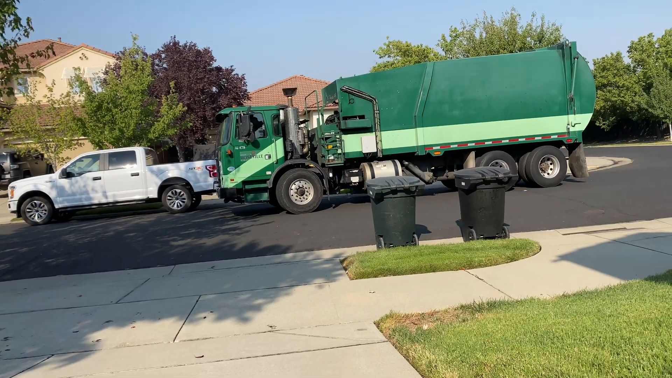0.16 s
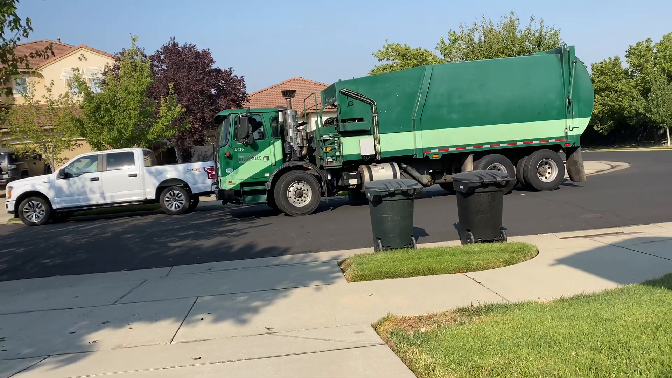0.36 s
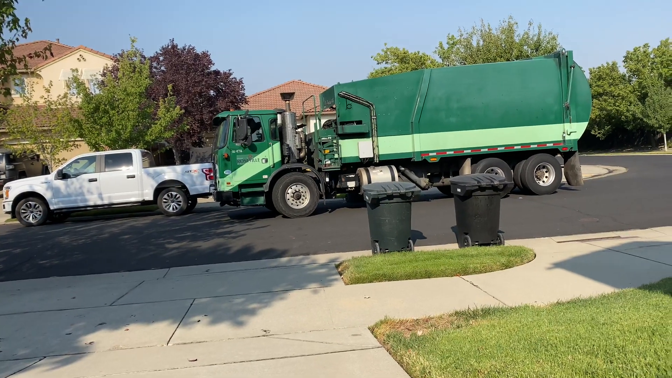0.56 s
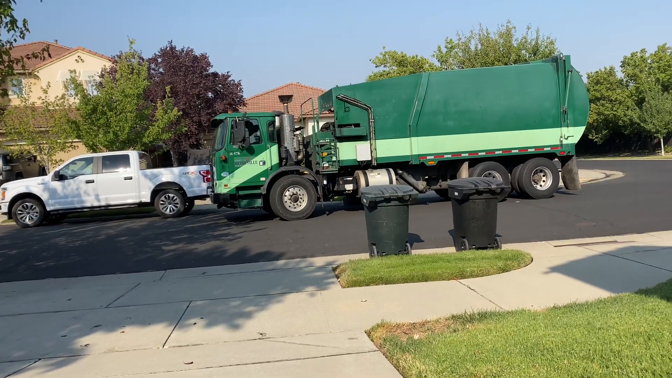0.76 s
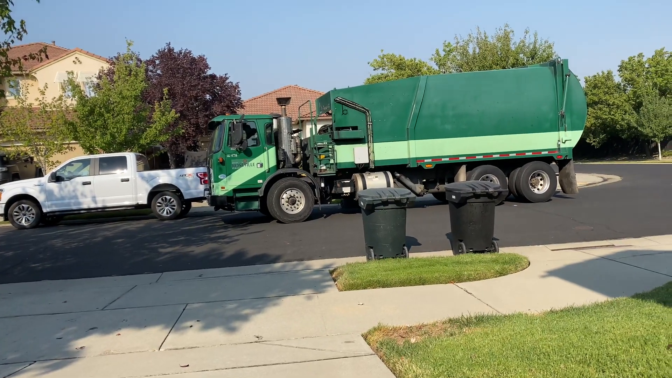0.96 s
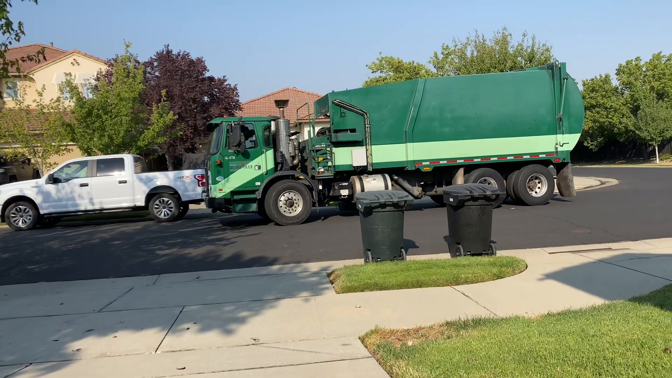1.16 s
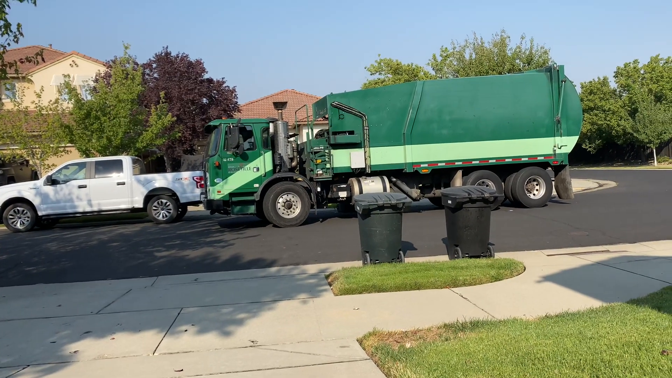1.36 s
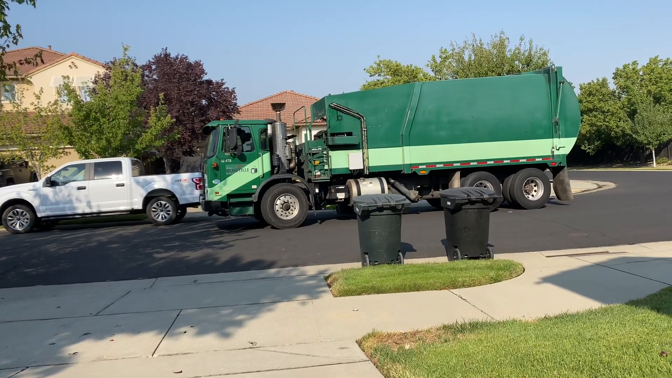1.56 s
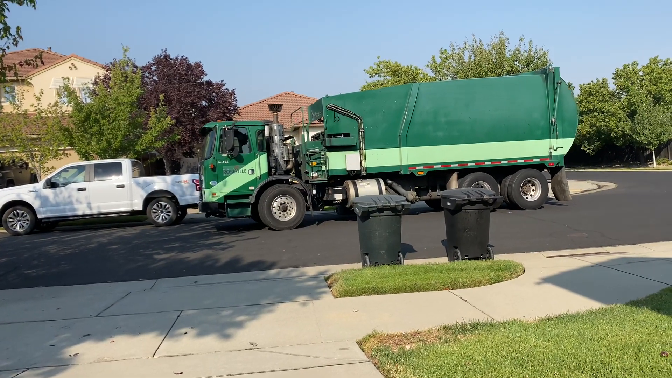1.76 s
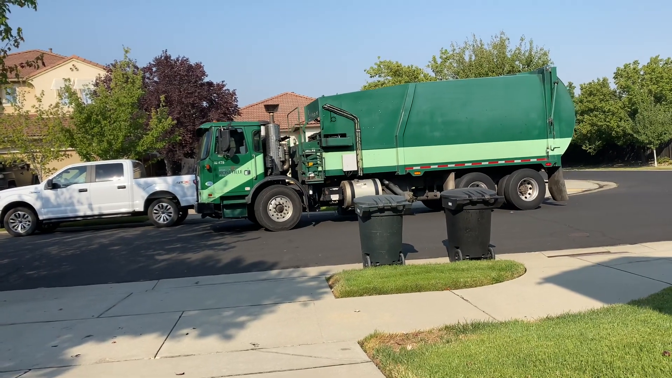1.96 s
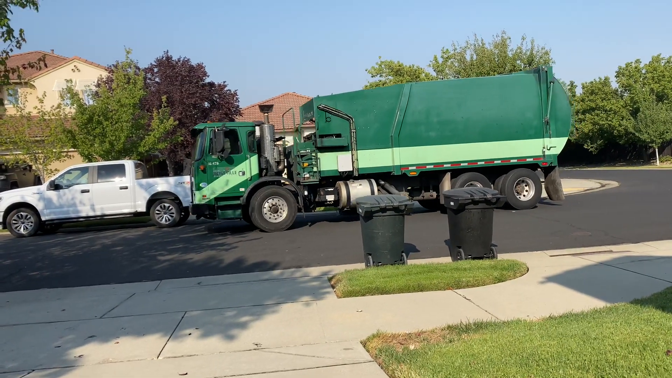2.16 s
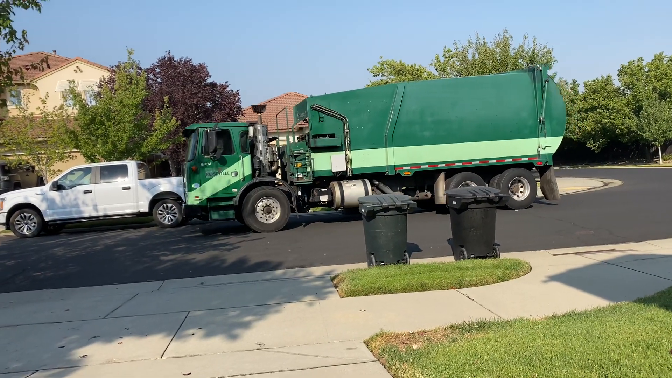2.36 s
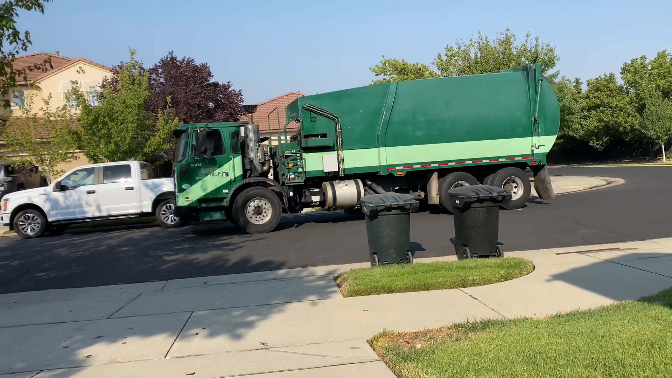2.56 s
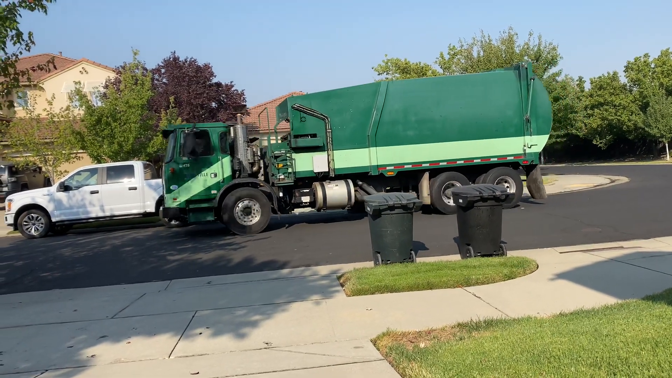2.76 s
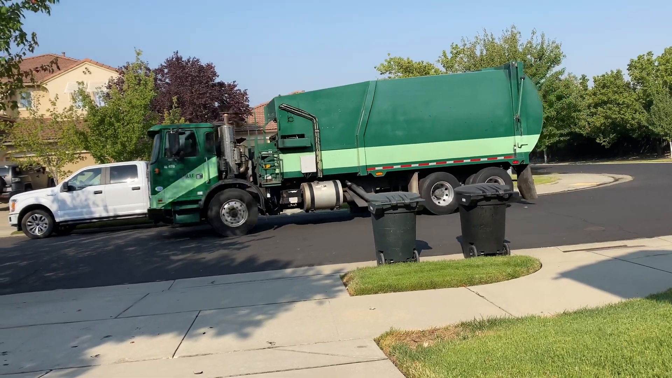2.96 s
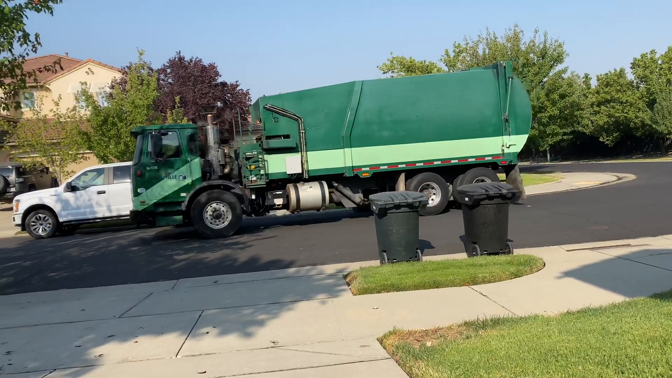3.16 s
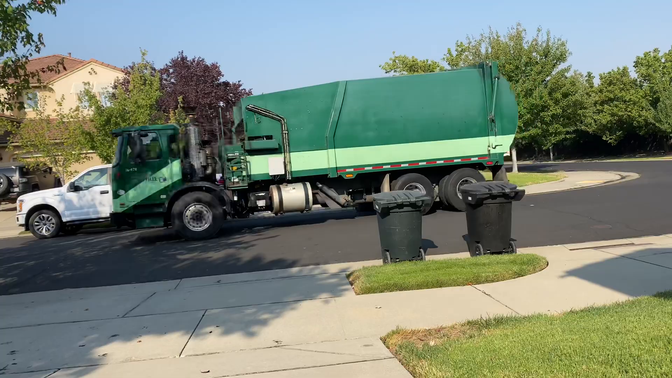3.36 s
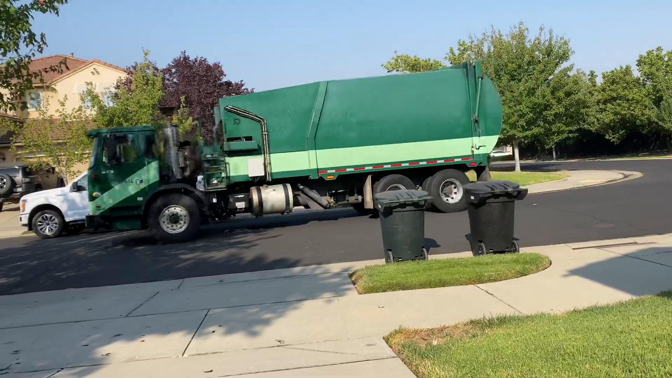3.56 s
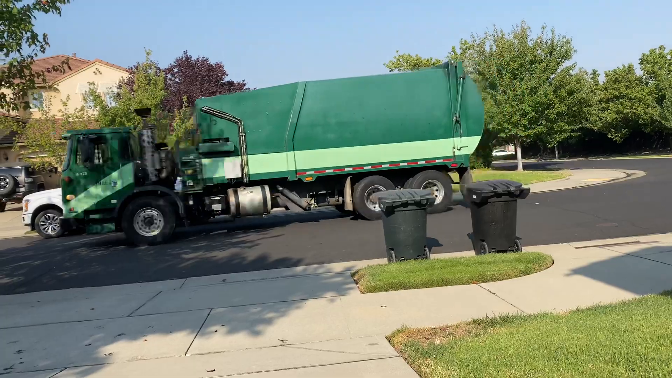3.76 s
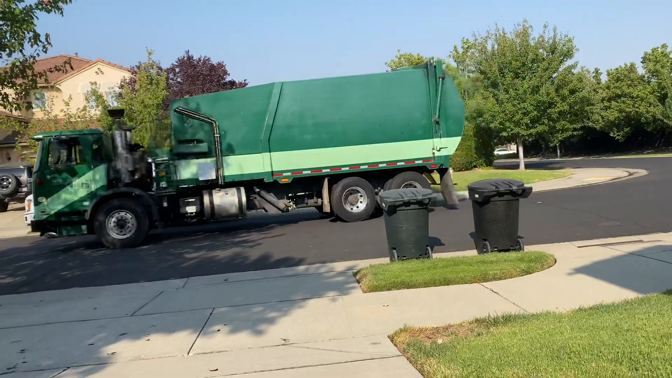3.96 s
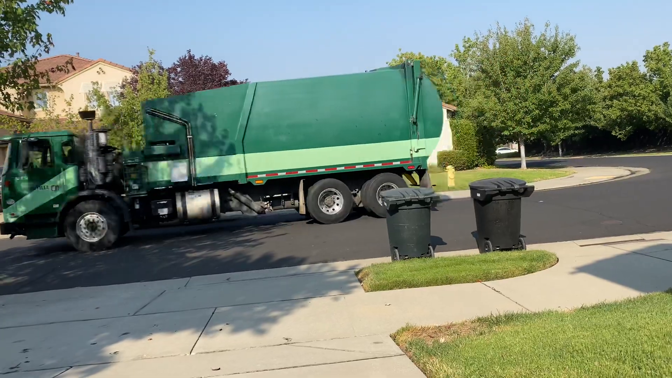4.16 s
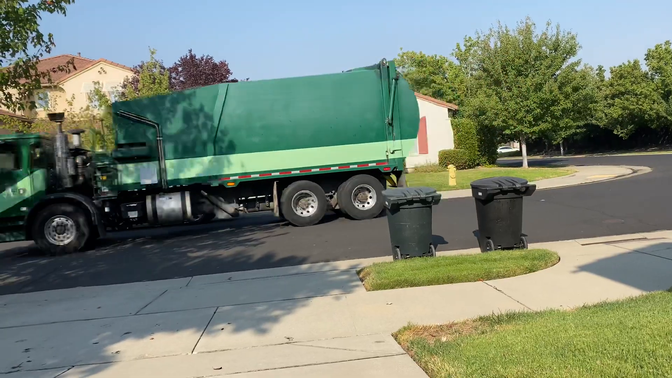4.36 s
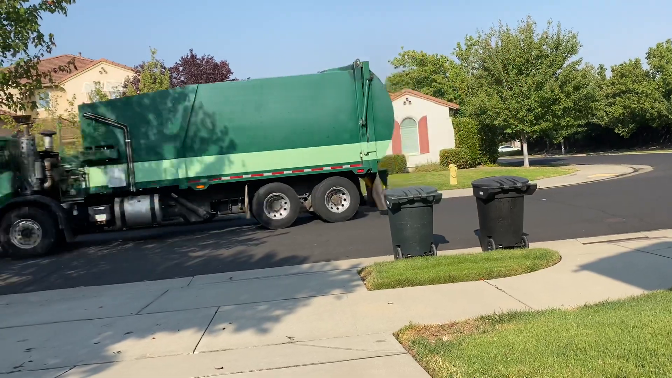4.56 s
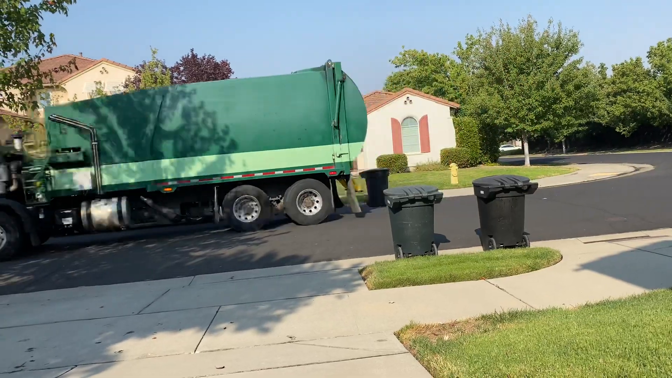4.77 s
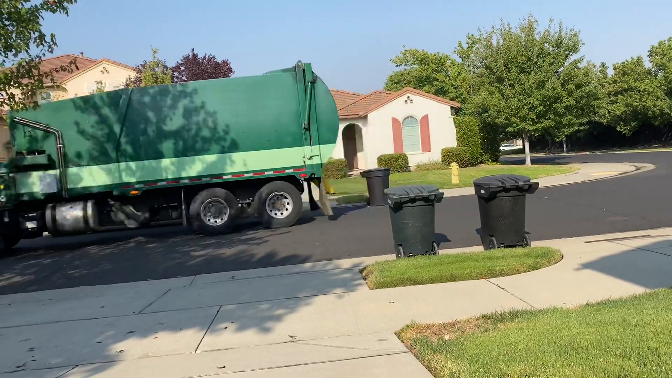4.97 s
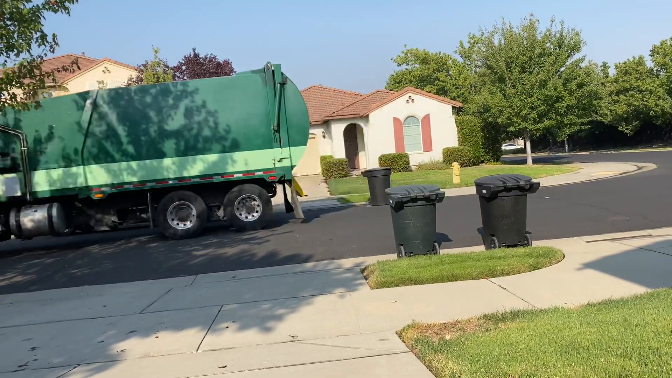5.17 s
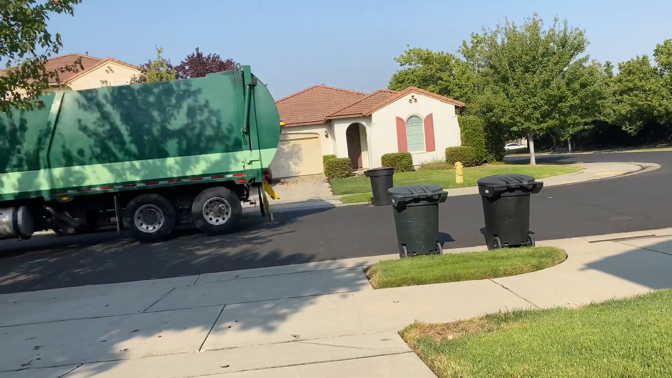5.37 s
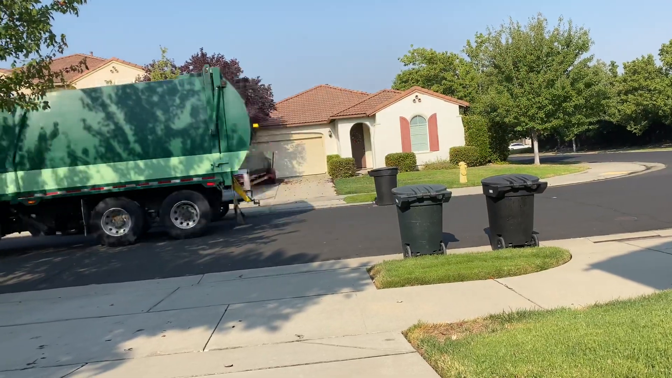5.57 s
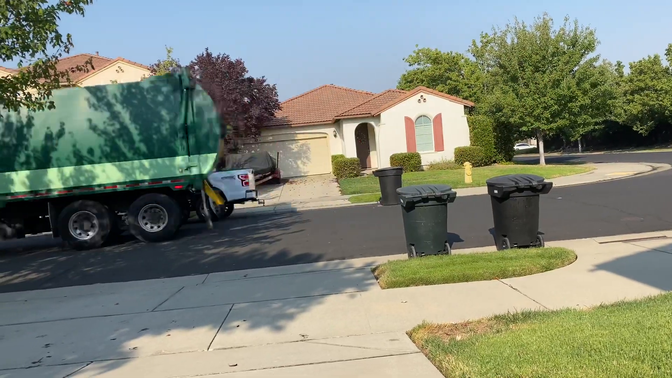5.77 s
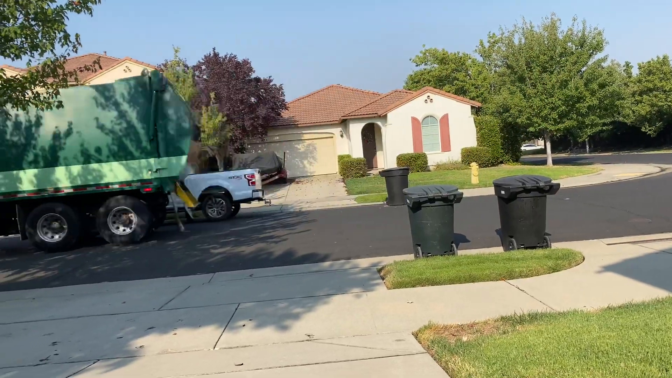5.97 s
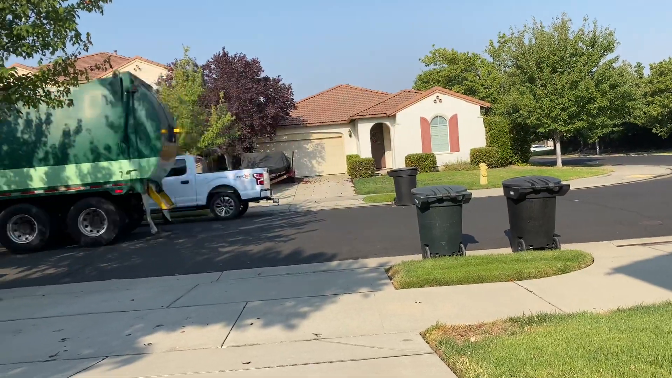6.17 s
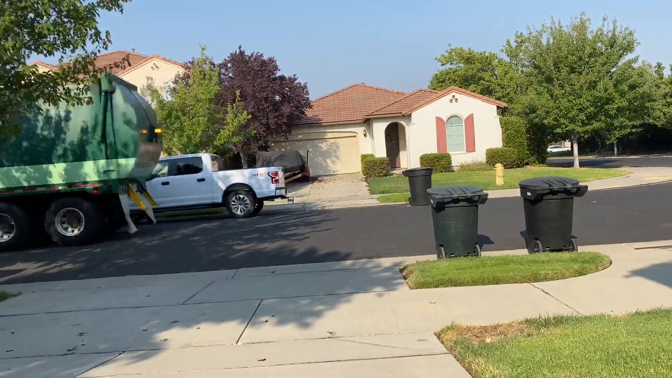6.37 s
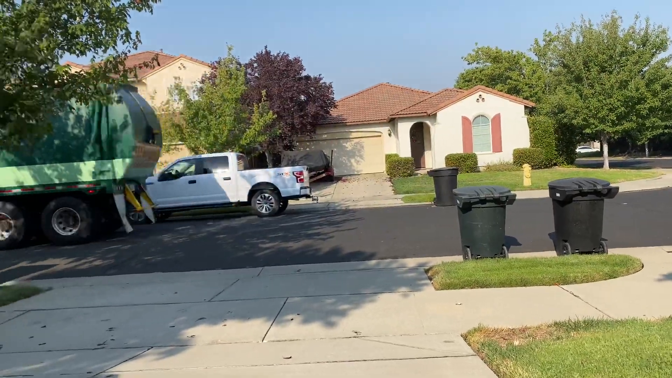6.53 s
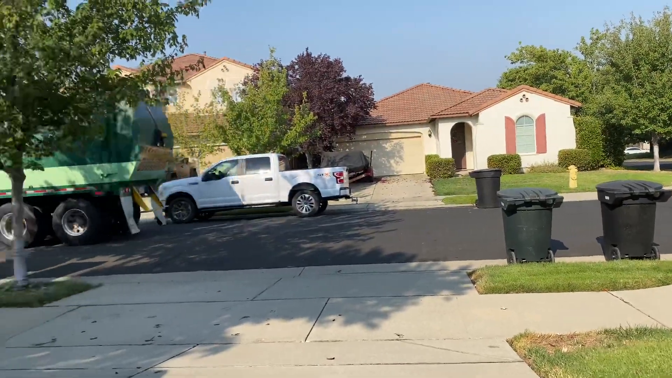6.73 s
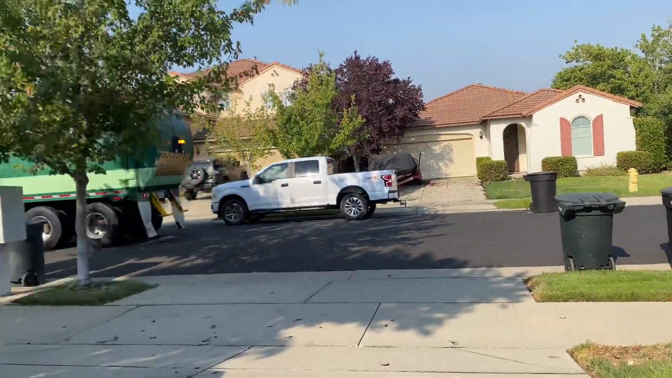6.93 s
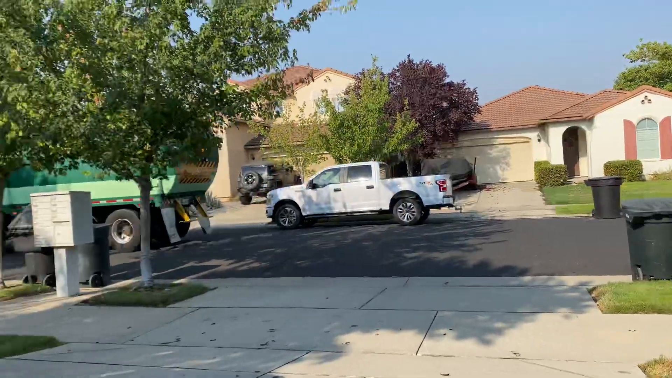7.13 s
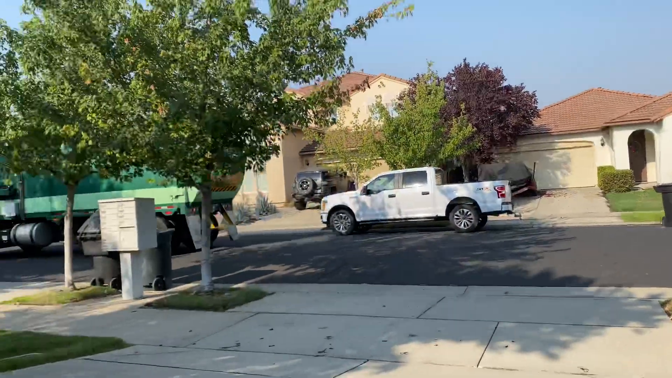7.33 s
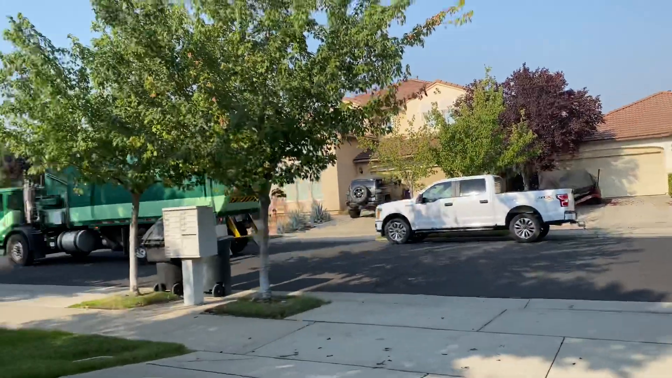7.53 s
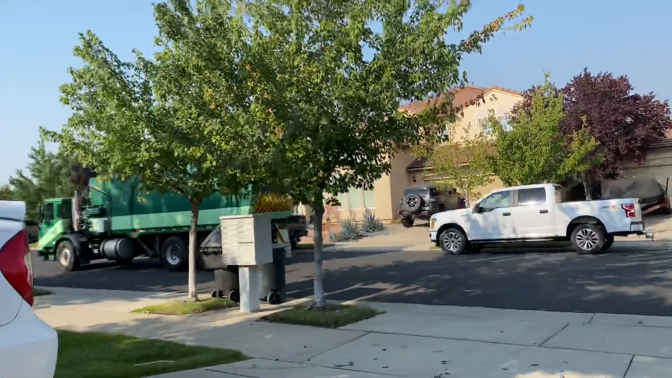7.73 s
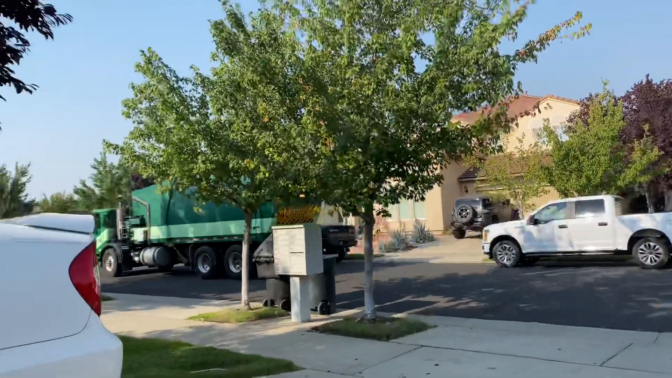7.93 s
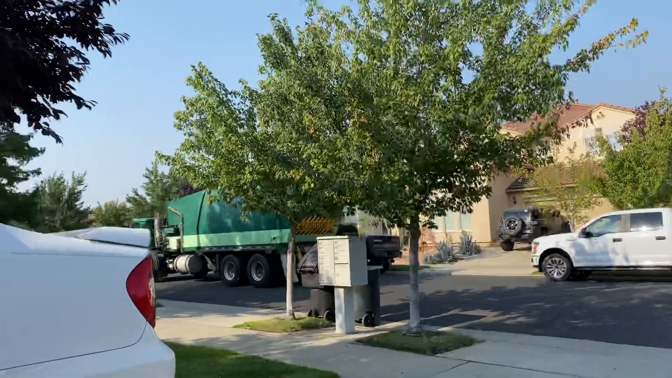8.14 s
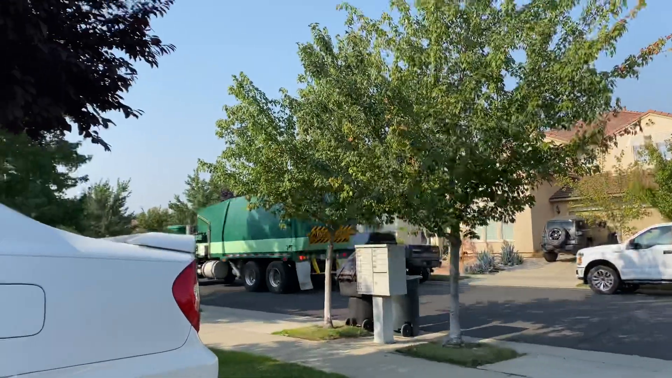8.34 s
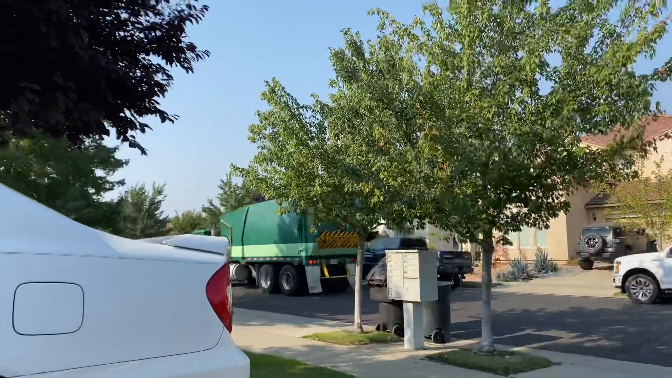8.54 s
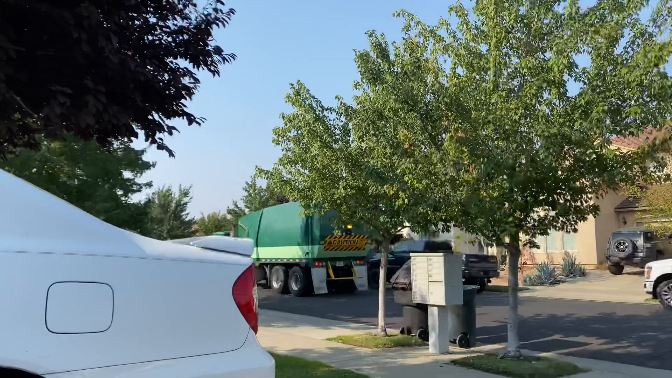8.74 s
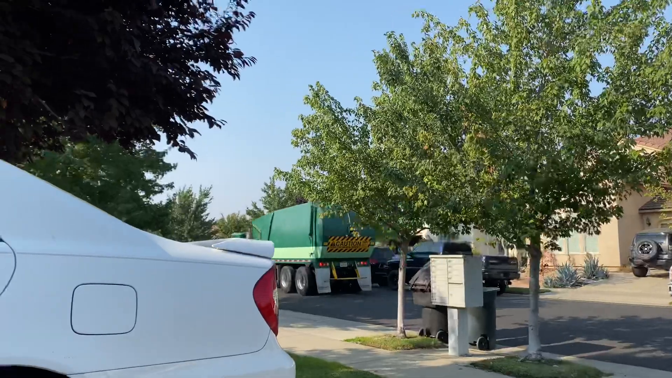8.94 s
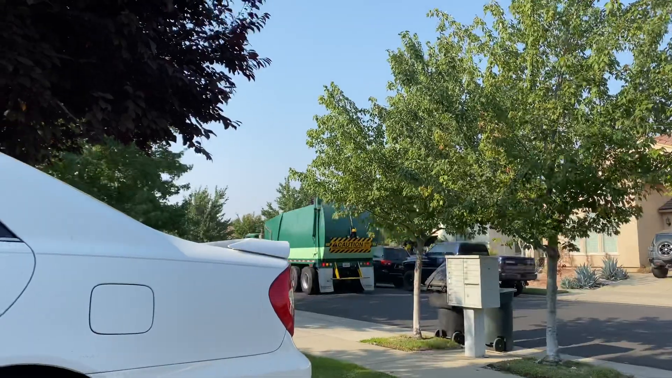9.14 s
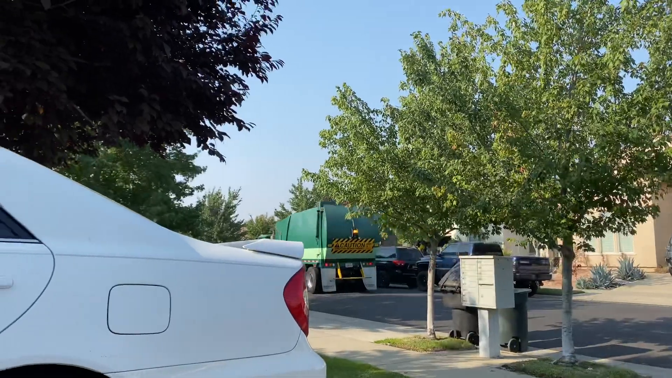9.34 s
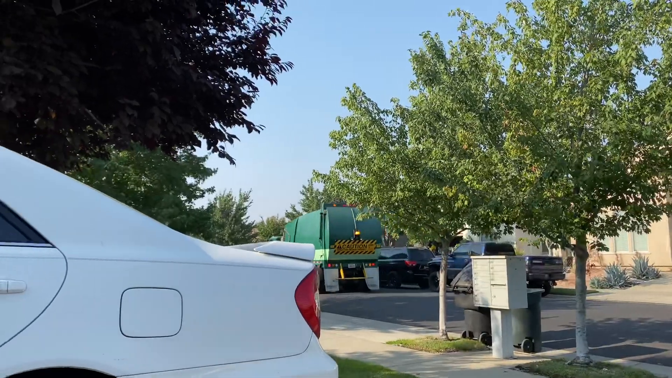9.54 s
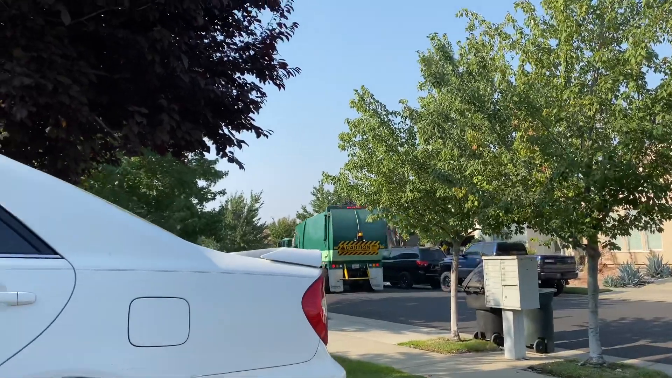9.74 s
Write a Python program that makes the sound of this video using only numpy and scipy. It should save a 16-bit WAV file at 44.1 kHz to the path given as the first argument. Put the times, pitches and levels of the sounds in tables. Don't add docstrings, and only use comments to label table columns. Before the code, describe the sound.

A heavy diesel refuse truck idles, hisses air and bangs its arm down, then revs, roars past to the left and brakes with a faint high squeal.

```python
import sys
import numpy as np
from scipy import signal
from scipy.fft import rfft, irfft, next_fast_len
from scipy.io import wavfile
from scipy.ndimage import uniform_filter1d, map_coordinates

SR = 44100
rng = np.random.default_rng(int(sys.argv[2]) if len(sys.argv) > 2 else 0)


def ratio(d):
    e = np.asarray(d, float) / 20
    return 10 ** e


def log_audio(samples):
    frames = np.atleast_2d(samples).T
    limited = np.clip(frames, -1, 1)
    pcm = np.round(limited * 32767).astype(np.int16)
    wavfile.write(sys.argv[1], SR, pcm)


N = 436587

# time_s, shaft_hz
SHAFT_SPEED = [(.75, 21.9), (1.4, 24.5), (2, 19.5), (2.8, 23.4), (3.38, 27.2), (3.8, 27.2), (4.75, 30.7),
               (5.64, 33), (5.9, 32.8), (6.1, 31.7), (6.42, 27.6), (6.7, 25.9), (7.46, 25.7), (8, 23.6),
               (8.4, 18.6), (8.72, 18.4), (9.1, 14.8), (9.9, 12.8)]
# time_s, throttle_db over idle
THROTTLE = [(0, -0.5), (.7, -0.7), (1.6, 1.5), (1.9, 3.5), (2.3, 5), (2.8, 8), (3.4, 9.5), (4, 10),
            (4.6, 11), (5.5, 11.5), (6.1, 7.5), (6.45, 3), (6.7, 4), (7.1, 7), (7.85, 6), (8.2, -1),
            (8.9, -0.8), (9.9, -2)]
# time_s, distance_m
DISTANCE = [
    (0, 12.5),
    (2.5, 10.74),
    (4.2, 9.5),
    (5.8, 12),
    (7, 14.1),
    (8.2, 16.9),
    (9.9, 33.2),
]
# time_s, facing (0 front, 1 side, 2 rear)
FACING = [(0, 0.38), (2.6, 0.67), (4.2, 0.96), (6, 0.91), (6.6, 1.33), (7.2, 1.34), (7.7, 1.57),
          (8.3, 1.52), (9.9, 1.4)]
CYLINDERS = [-1.5, -5, -12, -12.5, -1.5, -8.5]
# pitch_hz, density_db per Hz
EXHAUST_COLOUR = [(20, -70), (30, -26), (50, -7.5), (62, -8.5), (80, -1), (94, -7), (106, 4), (125, -5.5),
                  (165, -3), (230, -14.5), (400, -69)]
# pitch_hz, density_db per Hz
PANEL_COLOUR = [(90, -59), (130, -5.5), (170, -0.5), (250, 2.5), (340, -5.5), (410, -6.5), (480, -6.5),
                (560, -12.5), (800, -64)]
# pitch_hz, density_db per Hz
BLOCK_COLOURS = [
    [(380, -58), (540, -7), (620, -16.5), (690, -40), (750, -12), (830, -0.5), (920, -25), (1150, -6.5),
     (1270, -8.5), (1400, -0.5), (1530, -18.5), (2000, -14), (2400, -6.5), (4200, -39)],
    [(380, -40), (540, 1), (750, -2), (950, -4.5), (1130, -1), (1220, -4.5), (1290, -11.5), (1580, -6.5),
     (1700, -11), (1900, -14), (2000, -14), (2250, -22), (2450, -23.5), (4200, -53)],
    [(380, -66), (540, 7), (650, -6.5), (750, -2.5), (950, -13), (1080, -37), (1150, -31), (1300, 2),
     (1400, -6.5), (1800, -16), (1920, -10.5), (2200, -11.5), (2400, -11.5), (4200, -84)],
]
# pitch_hz, density_db per Hz
INTAKE_COLOUR = [(1700, -41), (2300, -1), (2650, -1.5), (3000, -2), (3400, -3.5), (4200, -5), (5000, -8.5),
                 (6000, -12), (8000, -9.5), (11000, -15), (13000, -18), (15500, -24), (15900, -69)]
# idle_db before distance terms, growth_db per dB of throttle, extra_loss_db per 10 m beyond 5 m,
# rear_over_front_db
PARTS = [
    (-23, -0.01, 1.03, 0.5),
    (-20, 0.8356, 0.68, 1),
    (-33, 1.1565, 1.43, -2),
    (-44.5, 1.09, 1.85, -5.5),
]
# top_s, rise_s, hold_s, fall_s, level_db
LURCHES = [
    (1.15, 0.86, 0.078, 1, -37.5),
    (1.8, .5, .1, 0.36, -29),
    (3.4, 0.75, .05, 0.44, -17.5),
    (4.0, 0.39, 0.26, 0.85, -23),
    (5.2, 0.78, .05, 0.52, -23),
    (6.1, 0.56, 0.058, .4, -26),
    (8.2, 0.43, 0.14, .5, -37),
]
# top_s, rise_s, hold_s, fall_s, level_db
PUMP = [(.75, 0.29, .05, 0.63, -31.5), (1.3, 1.4, 0.058, 0.073, -26), (3.2, .5, 0.15, 0.69, -15.5),
        (3.85, 0.41, 0.048, .2, -24), (4.05, 0.14, .12, .3, -21.5), (4.8, 0.28, 0.07, .3, -30),
        (5.33, 0.25, 0.13, .3, -24), (5.55, 0.64, 0.46, 0.08, -17), (6.05, 0.52, 0.053, 0.044, -11.5),
        (6.27, 0.19, 0.086, 0.26, -19), (6.6, 0.44, .1, 0.33, -33), (6.96, 0.32, 0.52, 0.7, -18.5),
        (7.95, 1.1, 0.064, .13, -33), (8.5, 0.47, 0.25, 0.13, -27.5), (9.1, 0.33, 0.093, 1.1, -35)]
# top_s, rise_s, hold_s, fall_s, level_db
PUMP_OCTAVE = [(4.2, 0.67, .1, .6, -38), (6.6, 0.89, 0.2, .8, -34), (7.3, 0.31, .3, 0.49, -39.5)]
# top_s, rise_s, hold_s, fall_s, level_db
FAN = [(3.5, 1.8, 0.39, 1, -28.5), (4.75, 1.8, 0.023, 0.79, -22.5), (5.6, 0.88, 0.076, 0.73, -18.5),
       (6.48, 0.66, 0.052, 0.28, -22.5), (6.9, 0.32, 0.41, 0.55, -23.5), (7.8, 0.47, 0.17, 0.32, -30.5),
       (8.7, 0.97, 0.1, 1.2, -33)]
# top_s, rise_s, hold_s, fall_s, level_db
GEARS = [
    (3.3, 1.57, 0.45, 0.86, -32),
    (4.3, 1.03, 0.37, 2.1, -34),
    (5.5, 1.1, .4, .8, -34.5),
]
GEAR_ORDERS = [13.8, 14.9]
# time_s, pitch_hz, level_db
TURBO = [(2.8, 7400, -63), (3.3, 9200, -54), (3.75, 10000, -51.5), (4.3, 10380, -44.5), (4.8, 10500, -50.5),
         (5.5, 11020, -46.5), (5.95, 10530, -54), (6.4, 9100, -66), (7.0, 7800, -51)]
# time_s, pitch_hz, level_db
BLADES = [(1.8, 10900, -77), (2.4, 12200, -71), (2.9, 13500, -51), (3.4, 14550, -51), (5.5, 14600, -57),
          (6.3, 14600, -65), (6.8, 13900, -54), (7.4, 13600, -59), (8.2, 12000, -79)]
# time_s, pitch_hz, level_db
SQUEAL = [
    [(8.57, 14700, -42), (8.64, 14780, -44), (8.69, 15220, -44), (8.78, 15180, -43), (8.82, 14720, -40),
     (8.88, 14500, -39), (8.95, 14560, -40), (9.0, 14760, -40), (9.2, 14930, -42)],
    [(9.22, 15360, -42), (9.3, 15400, -41), (9.43, 15340, -42), (9.47, 14900, -43), (9.62, 14820, -44),
     (9.68, 14760, -41), (9.8, 14680, -40), (9.9, 14570, -40)],
]
# start_s, length_s, pitch_hz, end_pitch_hz, level_db
CATCHES = [(8.79, .16, 12150, 12100, -42), (9.02, .06, 12000, 12150, -51), (9.22, .26, 11600, 11660, -36),
           (9.46, .22, 11740, 11850, -51), (8.78, .32, 13600, 13800, -44), (8.71, .1, 12880, 13100, -47),
           (9.17, .12, 12850, 13050, -53), (9.46, .25, 12950, 13150, -50), (9.45, .32, 9950, 10220, -63),
           (9.67, .23, 13650, 14000, -43), (9.55, .14, 14900, 15500, -50), (9.16, .04, 15150, 15350, -47),
           (9.22, .13, 14900, 15000, -49), (9.1, .04, 13200, 13200, -54), (9.3, .16, 14050, 14300, -63),
           (9.53, .08, 13750, 13700, -50), (8.8, .12, 9400, 9700, -64), (9.4, .2, 12250, 12350, -60),
           (8.74, .08, 15400, 14900, -46)]
# pitch_hz, share in quadrature
SQUEAL_TURN = [(12300, 0), (12800, .35), (13200, .3), (13500, -.3), (14000, -.3), (14300, 0)]
# start_s, rise_s, t60_s, level_db, valve
VENTS = [(.33, 0.053, .9, -41.5, "pop"), (.424, 0.0037, 0.14, -29.5, "pop"),
         (.425, 0.0098, 0.32, -39, "bleed"), (.426, 0.024, .45, -47, "pinhole"),
         (.52, .026, 2, -40, "dump"), (.56, 0.08, 3.5, -47.5, "pinhole"), (.95, .08, .8, -46, "pinhole"),
         (1.185, 0.015, 0.96, -38.5, "bleed"), (1.2, 0.05, 0.47, -39, "bleed"),
         (1.21, .045, 0.44, -38.5, "pinhole"), (3.875, 0.016, 0.97, -29.5, "dump"),
         (3.903, 0.0046, .063, -21.5, "pop")]
NOZZLES = {"dump": (1100, -21, 1.25), "bleed": (2500, -2.5, 2.8), "pinhole": (6000, 6.8, 2.2),
           "pop": (2130, -22, 1)}
# start_s, thud_db, clatter_db, t60_s
BLOWS = [(0.406, -16, -30, 1.6), (.899, -19, -31, 0.28), (0.906, -23, -30.5, 0.25), (0.916, -7, -35, 0.18),
         (.927, -2.5, -33.5, 0.22), (.935, -6, -35, 0.45), (.942, -27, -30, 0.26), (.957, -9, -27, 0.099),
         (.965, -3.5, -48, 0.41), (0.974, -24, -36, .35), (.985, -30, -35.5, 1.6), (1.232, -30, -46, 1.6),
         (1.28, -32, -35, 0.36), (3.912, -8, -22, 0.34), (4.019, -12, -28, .2), (4.048, -4, -28, .27),
         (4.084, -5, -42, .2)]
# pitch_hz, width_hz, level_db
HOPPER_MODES = [(124, 8.2, 4), (156, 48, -0.5), (252, 73, -12), (390, 64, -5.5)]
# pitch_hz, density_db per Hz
CLATTER_COLOUR = [(300, -3), (600, 4.5), (1300, 6.5), (2000, 0.5), (4000, -5.5), (5400, -12.5),
                  (6200, -16.5), (7500, -12.5), (9500, -16), (16000, -40)]
# start_s, pitch_hz, level_db, t60_s
CLANKS = [(.906, 1940, -21, .06), (.918, 1300, -19, .07), (.945, 2500, -28, .05), (0.956, 1408, -16, 0.053),
          (.957, 1900, -23, 0.057), (.974, 1490, -24, 0.065), (.978, 2400, -27, .05),
          (.992, 1010, -31, .06), (.912, 1100, -23, .06), (.928, 2200, -27, .05), (.94, 900, -25, .05),
          (.426, 1600, -29, .06), (.432, 2500, -35, .05)]
# start_s, length_s, pitch_hz,
# level_db, overtone_db
SQUEAKS = [(0, .13, 10700, -63, -40), (.585, .03, 4700, -55, -40), (1.69, .1, 1600, -41, -30),
           (3.903, .014, 2600, -27, -30), (7.1, .07, 1050, -42, -30), (8.455, .022, 2310, -44, -13),
           (8.474, .022, 2330, -43, -7), (8.488, .03, 2370, -41, -13), (8.513, .026, 2350, -55, -9),
           (8.49, .02, 2480, -52, -9), (8.545, .016, 2380, -54, -20), (8.545, .065, 1930, -54, -20),
           (8.636, .03, 2260, -58, -20), (8.668, .022, 2250, -58, -20), (8.694, .016, 2240, -59, -20),
           (8.85, .06, 2540, -61, -20), (9.29, .1, 2890, -62, -4), (9.35, .06, 2900, -64, 1),
           (9.39, .09, 2895, -61, -7), (9.75, .13, 6950, -67, -30)]
# start_s, length_s, pitch_hz, level_db
RINGS = [(0, 0.38, 111.2, -33.5), (.3, 0.42, 107.9, -32.5), (.38, 0.16, 206.2, -27), (.98, 0.2, 135.2, -25),
         (1.37, 0.2, 107.2, -24), (1.83, 0.13, 269, -27), (1.85, 0.26, 149, -26), (2.2, 0.16, 114.2, -29.5),
         (2.32, 0.18, 165.7, -23.5), (2.46, 0.2, 266.8, -26), (2.7, 0.21, 175.3, -25),
         (2.86, 0.11, 196.5, -24), (3.3, 0.34, 105.8, -31), (4.17, 0.3, 101, -28),
         (4.32, 0.14, 208.5, -19.5), (3.74, 0.12, 375, -24), (3.86, .12, 141, -22), (3.98, .14, 105, -18),
         (4.05, 0.078, 420, -25.5), (4.58, 0.11, 425, -27.5), (5.05, 0.11, 247, -21),
         (4.55, 0.24, 170.3, -25.5), (4.8, 0.15, 171.6, -25.5), (5.0, 0.36, 105, -31),
         (2.005, 0.16, 311, -30), (2.25, .16, 335.5, -31.5), (4.62, 0.16, 205, -25),
         (6.2, 0.14, 304.4, -27.5), (6.335, 0.13, 301, -31), (6.497, 0.21, 328, -35),
         (7.415, 0.15, 326, -31), (7.563, 0.11, 322, -31.5), (8.146, 0.17, 335, -39.5),
         (6.6, 0.13, 422.6, -35.5), (6.88, 0.17, 142, -34), (7.08, 0.14, 149, -39),
         (7.12, 0.19, 409, -32.5), (7.66, 0.23, 99, -26.5), (7.74, 0.22, 355, -31),
         (8.55, 0.24, 105.8, -29.5)]
# pitch_hz, correlation
PORT_LIKENESS = [(100, .99), (300, .975), (450, .93), (650, .6), (1000, .91), (1400, .86), (2000, .6),
                 (3000, .73), (4000, .62), (5000, .65), (5800, .45), (6800, .55), (7700, .9), (9000, .965),
                 (16000, .97)]
# pitch_hz, left_over_right_db
PORT_BALANCE = [(60, 0), (200, -0.5), (430, -2), (540, -5), (620, -10), (700, -2.5), (1000, 0), (1400, -3),
                (2400, 1.5), (4400, 5), (6500, 4), (8000, 1.5)]
# pitch_hz, left_lead_rad
LEAD_AHEAD = [(0, 0), (200, -.3), (610, -.45), (740, 1.4), (1200, .7), (2200, .6), (2750, 1.3), (3200, 2),
              (3800, 1.5), (5300, 1.2), (5700, -.8), (7000, -1.6), (7700, -2.75), (8900, -3.55),
              (10100, -5.5), (11600, -7.1), (12950, -9), (13900, -10), (14650, -11), (16000, -12.7)]
# pitch_hz, left_lead_rad
LEAD_ASIDE = [(400, 0), (600, 1.1), (800, .3), (1200, .85), (1600, 2.6), (2400, 4.7), (2800, 5.1),
              (3300, 4.7), (4250, 5.6), (4320, -.5), (5300, 0), (5800, .5), (6600, 1.1), (7200, .7),
              (7700, .3), (8200, 0)]
# time_s, bearing (0 ahead, 1 far left)
BEARING = [(1.6, .02), (3.2, .18), (3.65, .28), (4.2, .5), (4.8, .75), (5.5, .97), (6.3, 1.04), (7.2, .9),
           (7.8, .5), (8.3, .02)]
# pitch_hz, bearing of the half swing
SWING = [(1600, .8), (2600, 1.2), (3300, .7), (4000, .45), (4800, .3)]

SWELL_DB = 20
SQUEAK_RISE = .007
STREET_DB = -59
TOP_HZ = 15830


def unit(x):
    return x / np.sqrt(np.mean(x ** 2) + 1e-20)


def along(points, hz):
    f, v = np.transpose(points)
    return np.interp(np.log(hz + 1), np.log(f + 1), v)


def curves(rows):
    s, *columns = np.transpose(rows)
    return [np.interp(np.arange(N) / SR, s, column) for column in columns]


def wobble(rate):
    knots = rng.standard_normal(int(N * rate / SR) + 4)
    return map_coordinates(knots, [np.arange(N) * rate / SR])


def filtered(x, response):
    m = next_fast_len(N + SR // 4)
    return irfft(rfft(x, m) * response(np.fft.rfftfreq(m, 1 / SR)), m)[..., :N]


def coloured(x, spectrum):
    return unit(filtered(x, lambda hz: ratio(along(spectrum, hz))))


def tone(hz, blur_hz, rate):
    turns = np.cumsum(hz + blur_hz * wobble(rate)) / SR
    return np.sqrt(2) * np.sin(2 * np.pi * turns)


def window(start, end, fade):
    t = np.arange(N) / SR
    return np.clip((t - start) / fade, 0, 1) * np.clip((end - t) / fade, 0, 1)


def fall(start, t60):
    return -60 * np.clip(np.arange(N) / SR - start, 0, None) / t60


def swells(rows):
    t, total = np.arange(N) / SR, 0
    for top, rise_s, hold_s, fall_s, db in rows:
        before = np.clip(top - t, 0, None) / rise_s
        after = np.clip(t - top - hold_s, 0, None) / fall_s
        total = total + ratio(db - SWELL_DB * (before + after))
    return total


def engine(shaft_hz):
    firing = 3 * np.cumsum(shaft_hz) / SR
    strength = ratio(np.array(CYLINDERS)[firing.astype(int) % len(CYLINDERS)])
    pulses = unit(np.diff(np.floor(firing), prepend=0) * strength * ratio(1.6 * wobble(40)))
    beat = strength * np.cos(2 * np.pi * firing)
    facing, = curves(FACING)
    pipe_gain, panel_gain, block_gain, intake_gain = levels(facing)
    surge = wobble(6)

    def gas(gate, kick):
        return (1 + gate * beat) * rng.standard_normal((2, N)) + [[kick], [0]] * pulses

    def sway(db):
        return ratio(db * (surge + wobble(11)))

    exhaust = pipe_gain * sway(db=.6) * coloured(gas(gate=.5, kick=.25), EXHAUST_COLOUR)
    panels = ratio(-6.5) * panel_gain * sway(db=.5) * coloured(gas(gate=.27, kick=.14), PANEL_COLOUR)
    source, block = gas(gate=.17, kick=.074), 0
    for side, colour in enumerate(BLOCK_COLOURS):
        block = block + np.clip(1 - abs(facing - side), 0, 1) * coloured(source, colour)
    block = block_gain * sway(db=.5) * block
    intake = intake_gain * sway(db=.43) * coloured(gas(gate=.11, kick=.01), INTAKE_COLOUR)
    return echoes(exhaust + panels, depth_db=1.2) + echoes(block + intake, depth_db=1.7)


def levels(facing):
    (throttle_db,), (metres,) = curves(THROTTLE), curves(DISTANCE)
    gains = []
    for db, grow, loss_db, rear_db in PARTS:
        part_db = db + grow * throttle_db - loss_db * (metres / 10 - .5) + rear_db * facing / 2
        gains.append(10 / metres * ratio(part_db))
    pipe, panels, block, intake = gains
    return np.hypot(pipe, swells(LURCHES)), panels, block, np.hypot(intake, ratio(STREET_DB))


def echoes(x, depth_db):
    z = signal.stft(x, nperseg=2048)[2]
    field = uniform_filter1d(rng.standard_normal(z.shape[1:]), size=4, axis=0)
    field = uniform_filter1d(field, size=14, axis=1)
    return signal.istft(z * ratio(depth_db * unit(field)), nperseg=2048)[1][:, :N]


def shaft_tones(shaft_hz):
    pump = swells(PUMP) * ratio(.7 * wobble(14)) * tone(9 * shaft_hz, .7, 20)
    octave = swells(PUMP_OCTAVE) * ratio(1.5 * wobble(14)) * tone(18 * shaft_hz, 1.5, 20)
    fan = swells(FAN) * ratio(.8 * wobble(10)) * tone(8 * shaft_hz, .6, 20)
    gears = 0
    for order in GEAR_ORDERS:
        gears = gears + swells(GEARS) * ratio(4 * wobble(7)) * tone(order * shaft_hz, 11, 40)
    return pump + octave + fan + gears


def turbo():
    spinning, blowing = window(2.7, 7.1, .15), window(1.7, 8.3, .2)
    hz, db = curves(TURBO)
    whistle = ratio(db + 3.3 * wobble(60) + 2 * wobble(3.99)) * spinning * tone(hz, blur_hz=35, rate=200)
    hz, db = curves(BLADES)
    blades = ratio(db + 3.32 * wobble(300)) * blowing * tone(hz, blur_hz=250, rate=700)
    return whistle + blades


def brakes():
    total = 0
    caught = [[(s, hz, db), (s + length, end_hz, db - 4)] for s, length, hz, end_hz, db in CATCHES]
    for rows in SQUEAL + caught:
        hz, db = curves(rows)
        on = window(rows[0][0] - .015, rows[-1][0] + .02, .015)
        skirt = ratio(-13) * tone(hz, 280, 900)
        line = tone(hz + 35 * wobble(35), 55, 300) + skirt
        total = total + ratio(db - 2 + 3 * wobble(70) + 2.5 * wobble(20)) * on * line
    return total


def vents():
    t, total = np.arange(N) / SR, 0
    for s, rise, t60, db, valve in VENTS:
        low_hz, tilt_db, holds = NOZZLES[valve]
        shape = np.clip((t - s) / rise, 0, 1) ** 2 * ratio(fall(s + rise * (1 + holds), t60))
        colour = [(low_hz / 4, -30), (low_hz, 0), (12000, tilt_db), (16000, tilt_db - 13)]
        jet = coloured(rng.standard_normal((2, N)), colour)
        total = total + ratio(db + 1.1 * wobble(60)) * shape * jet
    return total


def blows():
    t, push, shake = np.arange(N) / SR, np.zeros(N), np.zeros(N)
    soft = np.hanning(round(.004 * SR))
    for s, thud_db, clatter_db, t60 in BLOWS:
        push[round(s * SR):][:len(soft)] += ratio(thud_db) * soft
        shake += ratio(clatter_db + fall(s, t60)) * np.clip((t - s) / .009, 0, 1)

    def hopper(f):
        return sum(ratio(db) * 1j * f * w / (c * c - f * f + 1j * f * w) for c, w, db in HOPPER_MODES)

    thud = ratio(7) * filtered(push, hopper) * [[1], [.3]]
    grain = ratio(2 * wobble(300))
    return thud + shake * grain * coloured(rng.standard_normal((2, N)), CLATTER_COLOUR)


def clanks():
    t, total = np.arange(N) / SR, 0
    flutter = np.cumsum(90 * wobble(250)) / SR
    for s, hz, db, t60 in CLANKS:
        strike = ratio(db + fall(s, t60)) * np.clip((t - s) / .003, 0, 1)
        total = total + strike * np.sin(2 * np.pi * (hz * t + flutter))
    return total * [[1], [.5]]


def squeaks():
    total, flutter, grip = np.zeros(N), wobble(120), ratio(2.5 * wobble(70))
    for s, length, hz, db, over_db in SQUEAKS + [(*ring, -40) for ring in RINGS]:
        u = np.linspace(0, 1, round(length * SR))
        start = round(s * SR)
        pitch_hz = hz * (1 + SQUEAK_RISE * u) + .006 * hz * flutter[start:][:len(u)]
        turn = 2 * np.pi * np.cumsum(pitch_hz) / SR
        note = np.sin(turn) + ratio(over_db) * np.sin(2 * turn) + ratio(over_db - 11) * np.sin(3 * turn)
        total[start:][:len(u)] += ratio(db + 5) * np.sin(np.pi * u) ** .7 * note
    return total * grip


def scene():
    shaft_hz, = curves(SHAFT_SPEED)
    squeal = brakes()
    lines = shaft_tones(shaft_hz) + turbo() + squeal + squeaks()
    direct, scattered = engine(shaft_hz) + vents() + blows() + clanks()

    def spread(hz):
        angle = np.arccos(np.clip(along(PORT_LIKENESS, hz), -1, 1)) / 2
        return [np.cos(angle), np.sin(angle)]

    mid, side = filtered([direct, scattered], spread)
    side = side + filtered(squeal, lambda hz: 1j * along(SQUEAL_TURN, hz))
    return np.array([mid + lines + side, mid + lines - side])


def top_cut(x):
    return signal.sosfilt(signal.butter(12, 16940, fs=SR, output="sos"), x)


def record(dry):
    hz, t, z = signal.stft(dry, SR, nperseg=1024)
    bearing = np.interp(t, *np.transpose(BEARING)) ** 2
    halfway = along(SWING, hz)[:, None] ** 2
    swung = bearing * (1 + halfway) / (bearing + halfway)
    ahead = np.interp(hz, *np.transpose(LEAD_AHEAD))[:, None]
    aside = np.interp(hz, *np.transpose(LEAD_ASIDE))[:, None]
    half = np.exp(.5j * (ahead + aside * swung)) * (hz < TOP_HZ)[:, None]
    left = ratio(along(PORT_BALANCE, hz))[:, None] * half
    right = ratio(1.33) * half.conj()
    x = signal.istft(z * [left, right], SR, nperseg=1024)[1][:, :N]
    x = x / (1 + abs(x / .97) ** 6) ** (1 / 6)
    return top_cut(x)


dry = scene()
out = record(dry)
log_audio(out)
```